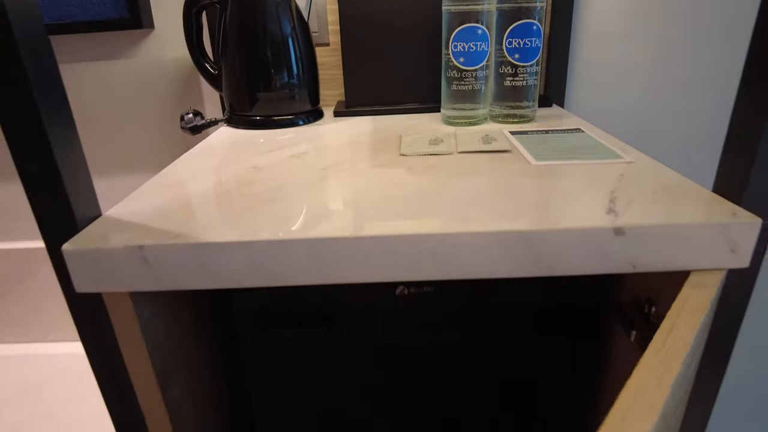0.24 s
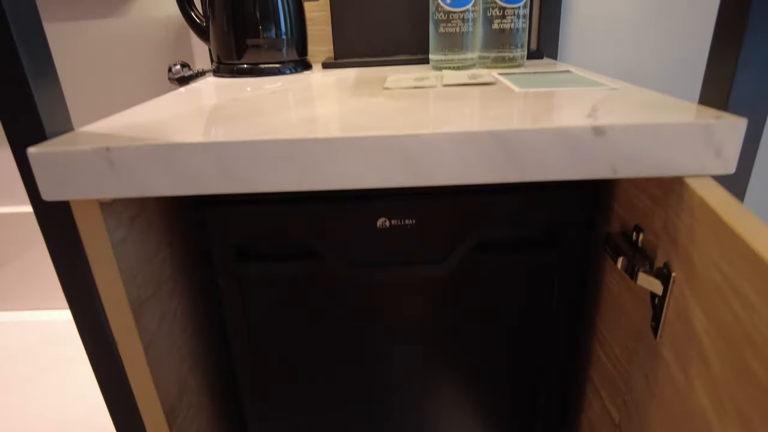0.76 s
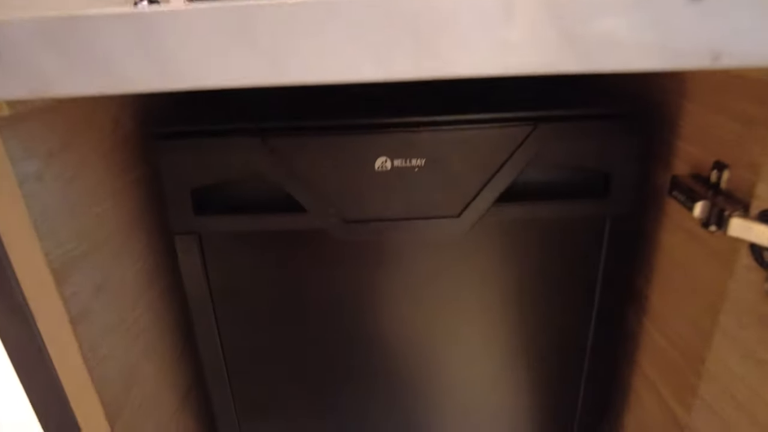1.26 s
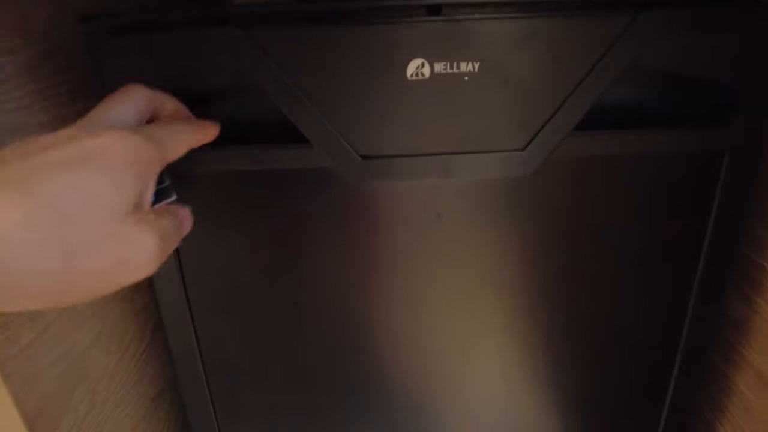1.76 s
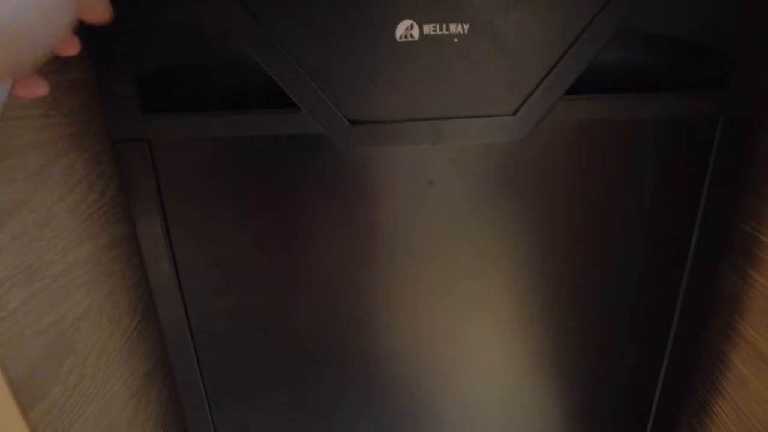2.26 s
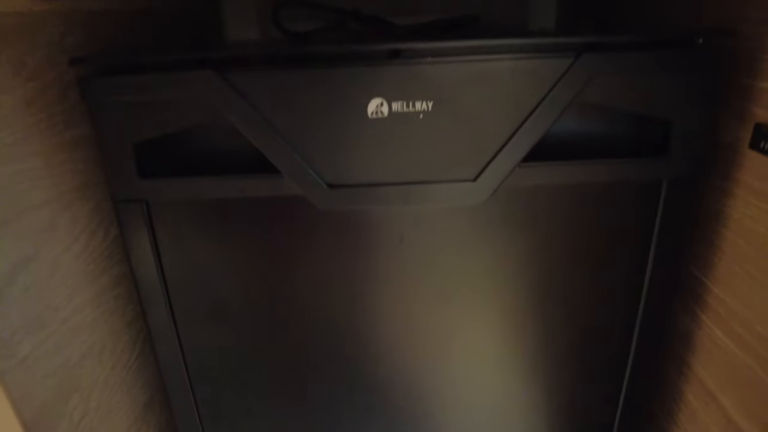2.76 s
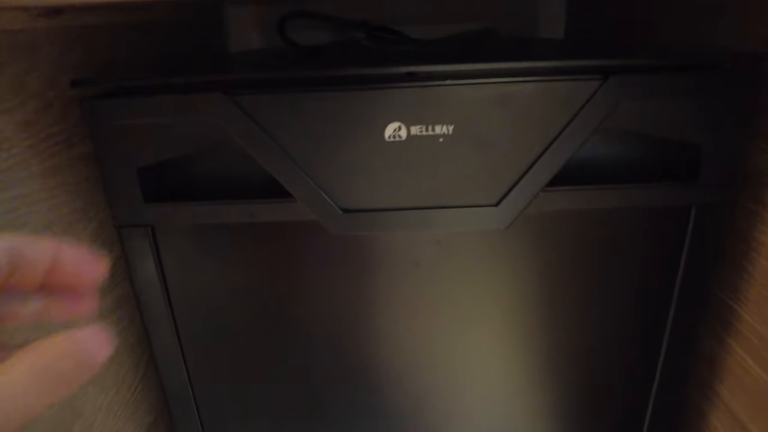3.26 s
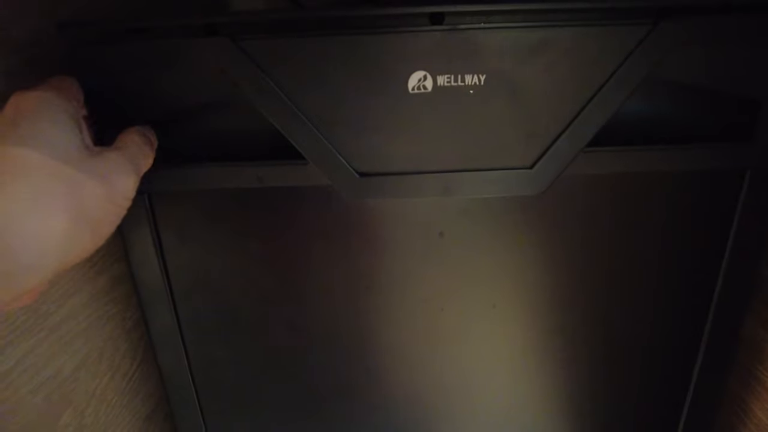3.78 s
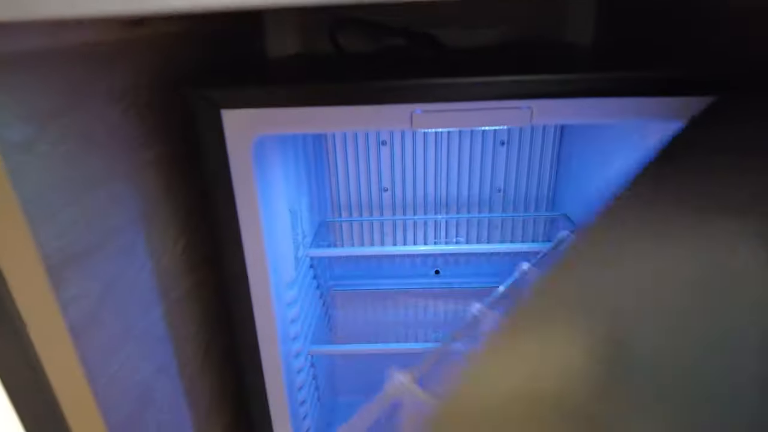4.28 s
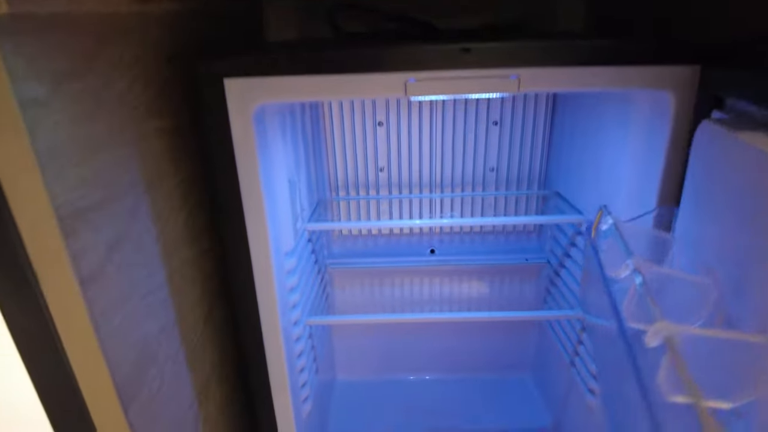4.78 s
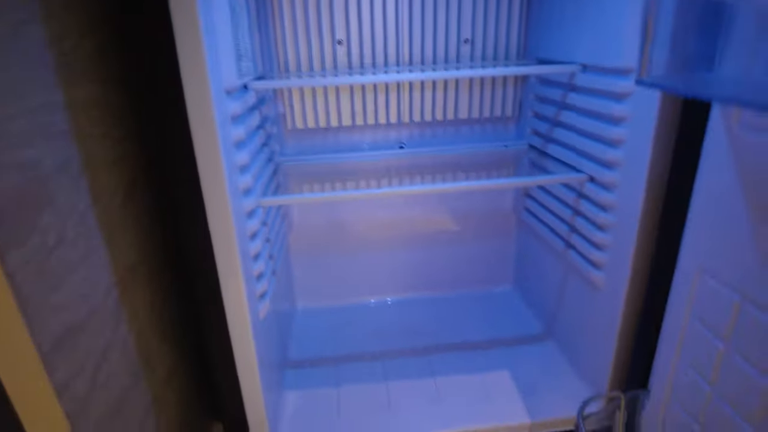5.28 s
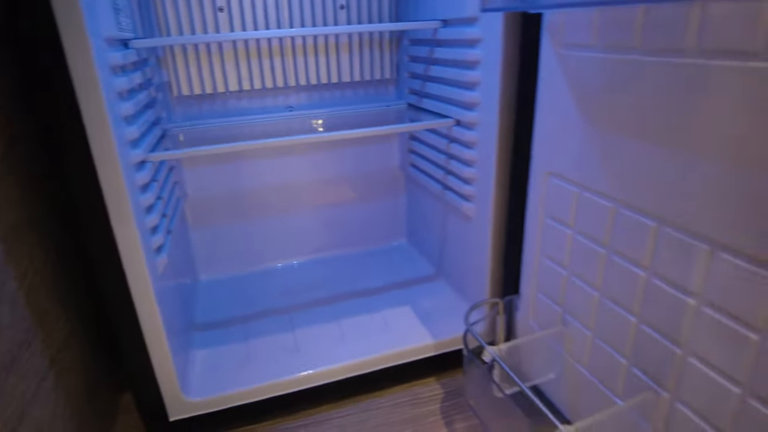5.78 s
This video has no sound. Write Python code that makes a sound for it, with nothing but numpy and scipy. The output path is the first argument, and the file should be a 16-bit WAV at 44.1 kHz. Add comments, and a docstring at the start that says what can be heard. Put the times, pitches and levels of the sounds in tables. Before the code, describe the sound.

Over a low ventilation rumble in a hotel room, a cupboard hinge rasps faintly and its wooden door bumps wide. Fingers knock hard on a hollow plastic fridge door, scrape and squeak briefly, and clack the trim. After a bright snap and a pause, the magnetic seal peels with crackles and pops. The door swings almost silently, ticks at the hinge and bumps the cupboard. A hand-held phone is close.

```python
"""A hand knocks and scrapes at a small fridge's plastic door, after a cupboard door swings open in a hotel room.
Noise bursts excite panel modes; after a sharp snap, random slips peel the magnetic seal.
The fridge door then swings until it bumps the cupboard.
A sleeve (slip noise) rustles close to the hand-held phone; ventilation (shaped noise) rumbles behind."""
import sys
import numpy as np
from scipy import signal
from scipy.fft import rfft, irfft
from scipy.io import wavfile

SR = 44100
rng = np.random.default_rng(int(sys.argv[2]) if len(sys.argv) > 2 else 0)


def digitize_waveform(pressure):
    """Quantize a signal to 16-bit integers and store it at the path in sys.argv[1].

    Rows of a 2-D input are taken as channels; values are limited to [-1, 1].
    """
    field = np.atleast_2d(pressure).T
    bounded = np.clip(field, -1, 1)
    quanta = np.round(bounded * 32767).astype(np.int16)
    wavfile.write(sys.argv[1], SR, quanta)


N = 266220
T = np.arange(N) / SR

# finger drags on the handle: t/s, length/s, level/dB, squeak f/Hz, squeak gain/dB
FINGER_SCRAPES = [(1.854, 0.03, -50, 2250, 15), (1.892, 0.038, -49, 2420, 11), (1.977, 0.038, -45, 2550, 4),
                  (2.001, 0.019, -48, 1830, -2), (2.024, 0.018, -48, 2720, 11), (2.07, 0.08, -79, 900, 11),
                  (2.139, 0.023, -53.5, 1490, -7), (2.248, 0.021, -59.5, 1640, -1),
                  (2.339, 0.036, -63, 1580, 16), (2.358, 0.012, -63.5, 1714, 1),
                  (2.473, 0.019, -66, 1520, 15)]

# lag of the right microphone behind the left
HAND_LEAD_SAMPLES, SEAL_LEAD_SAMPLES, CUPBOARD_LEAD_SAMPLES = 3, 2, 0
WALL_ECHO_S = 0.0016
# hand and phone keep moving: renewal step of rings and echoes, scatter of mode strength and tuning
MOVE_S, MODE_SCATTER_DB, MODE_DETUNE_SHARE = 0.25, 1.5, 0.008
# each doubling of contact length tilts a blow's spectrum down about the pivot
FIRM_CONTACT_S, DULLING_DB_PER_OCTAVE, PIVOT_HZ = 0.0027, 1.84, 970


def undb(db):
    """Decibels to gain."""
    return 10 ** (np.asarray(db) / 20)


def unit(x):
    """Scale to rms 1."""
    return x / np.sqrt(np.mean(x ** 2))


def over_bins(points, size):
    """Interpolate (f/Hz, value) points over log frequency at the bins of a transform."""
    hz, value = np.transpose(points)
    bins_hz = np.arange(size // 2 + 1) * SR / size
    return np.interp(np.log(bins_hz + 1), np.log(hz), value)


def colour(x, points):
    """Shape the spectrum of x, falling away below the first point; rms 1."""
    hz = np.arange(N // 2 + 1) * SR / N
    skirt = np.minimum(hz / points[0][0], 1) ** 4
    return unit(irfft(rfft(x) * undb(over_bins(points, N)) * skirt, N))


def diffuse(size):
    """Noise from all sides: bass alike in both microphones, treble mostly less so."""
    # likeness of the two microphones: f/Hz, correlation
    likeness = [(60, 0.97), (130, 0.96), (290, 0.89), (640, -0.17), (1400, 0.55), (3100, 0.0065),
                (7000, -0.11), (15000, -0.68)]
    alike = np.clip(over_bins(likeness, size), -1, 1)
    mid, side = rfft(rng.standard_normal((2, size)))
    mid = mid * np.sqrt((1 + alike) / 2)
    side = side * np.sqrt((1 - alike) / 2)
    return irfft(np.array([mid + side, mid - side]), size)


def fade(t, t60):
    """Exponential decay, 60 dB in t60."""
    return np.exp(-np.log(1000) * t / t60)


def add(track, s, x):
    """Mix x into the track at time s."""
    start = int(s * SR)
    track[start:start + len(x)] += x[:N - start]


def wander(rate_hz):
    """Random line of spread near 1, with a new value rate_hz times a second."""
    moments = np.arange(0, T[-1], 1 / rate_hz)
    return np.interp(T, moments, rng.standard_normal(len(moments)))


def slips(rate_hz, spread_db):
    """Stick and slip: random tiny releases of uneven size."""
    size = undb(spread_db * np.minimum(rng.exponential(size=N), 4))
    return (rng.random(N) < rate_hz / SR) * size * rng.choice([-1, 1], N)


def strokes(rows):
    """Gain of (t/s, length/s, level/dB) gestures that swell and ebb smoothly."""
    return sum(undb(db) * np.exp(-(2 * (T - s) / length) ** 2) for s, length, db, *_ in rows)


def changing(x, response, overlap):
    """Filter overlapping stretches of x by freshly drawn responses, as hand and phone move."""
    hop = int(MOVE_S * SR)
    padded = np.pad(x, (hop, 2 * hop))
    window = overlap(np.sin(np.pi * np.arange(2 * hop) / (2 * hop)))
    pieces = []
    for i in range(0, N + hop, hop):
        stretch = (window * padded[i:i + 2 * hop])[None]
        pieces.append(signal.fftconvolve(stretch, response(), axes=1))
    out = np.zeros((len(pieces[0]), N + 3 * SR))
    for k, piece in enumerate(pieces):
        out[:, k * hop:k * hop + piece.shape[1]] += piece
    return out[:, hop:hop + N]


def ring(x, modes):
    """Direct sound plus the decaying modes it excites; strength and tuning shift with the place of the hand."""
    t = T[:SR // 4]
    hz, db, t60 = np.transpose(modes)
    # unit gain at resonance for 0 dB
    peak_scale = 2 * np.log(1000) / (t60 * SR)
    decays = (undb(db) * peak_scale)[:, None] * fade(t, t60[:, None])

    def response():
        """One draw of the modes' impulse response."""
        strength, tuning = rng.standard_normal((len(hz), 2)).T
        mode_hz = hz * (1 + MODE_DETUNE_SHARE * tuning)
        waves = np.cos(np.outer(2 * np.pi * mode_hz, t).astype(np.float32))
        gain = undb(MODE_SCATTER_DB * strength)[:, None]
        return (gain * decays * waves).sum(axis=0)[None]
    return x + changing(x, response, np.square)[0]


def blows(rows, tone, tip, rise_share, spot_db=9, spot_width_hz=240, span_s=0.0035):
    """Contact noise builds up, meets hard at one instant (tip) and chatters away; levels are rms over span_s."""
    # band edges of boom, body, clack, tick, sheen: f/Hz
    blow_edges = [110, 400, 1100, 3300, 9500, 15500]
    track = np.zeros(N)
    t = np.arange(-SR // 40, SR // 10) / SR
    edges = np.transpose([blow_edges[:-1], blow_edges[1:]])
    bands = [signal.butter(3, pair, "band", fs=SR, output="sos") for pair in edges]
    octaves = np.log2(edges / PIVOT_HZ).mean(axis=1)
    for s, db, contact_s, spot_hz in rows:
        envelope = np.exp(np.minimum(t / rise_share, -t) / contact_s)
        force = rng.standard_normal(len(t)) * envelope - tip * (t == 0)
        # the struck spot has a short ring of its own
        spot = signal.iirpeak(spot_hz, spot_hz / spot_width_hz, fs=SR)
        force = force + undb(spot_db) * signal.lfilter(*spot, force)
        tilt = -DULLING_DB_PER_OCTAVE * np.log2(contact_s / FIRM_CONTACT_S)
        for sos, band_db in zip(bands, db + np.array(tone) + tilt * octaves):
            burst = unit(signal.sosfilt(sos, force)) * np.sqrt(span_s * SR / len(t))
            add(track, s + t[0], undb(band_db) * burst)
    return track


def ventilation():
    """Low rumble and a gently swaying rush of air, both changing as the phone moves."""
    # rumble level: t/s, level/dB
    rumble_level = [(0, -48.5), (1, -49), (2.3, -44.5), (2.85, -50), (4.4, -46.5), (5.3, -51.5),
                    (6.04, -49.5)]
    # rumble spectrum: f/Hz, level/dB
    rumble_colour = [(12, -25.5), (20, 1), (34, 4), (70, -5.5), (138, -9), (161, -14.5), (192, -12),
                     (274, -17), (309, -12), (348, -22), (392, -14.5), (428, -17.5), (700, -36), (910, -74),
                     (1540, -120)]
    # room air as the phone moves into the cupboard: t/s, level/dB
    air_level = [(0, -64), (1.1, -59), (2.5, -64), (3.45, -66), (4.25, -63), (5.1, -69), (5.5, -66.5),
                 (6.04, -64.5)]
    # air spectrum: f/Hz, level/dB
    air_colour = [(290, -1.5), (500, -0.5), (657, -2), (901, -5.5), (1170, -8.5), (1410, -6), (2330, -13.5),
                  (2800, -13), (5130, -29.5), (6090, -28), (15500, -35.5)]
    rumble = colour(diffuse(N), rumble_colour) * undb(np.interp(T, *np.transpose(rumble_level)))
    sway_db = 0.7 * wander(9)
    air_db = np.interp(T, *np.transpose(air_level)) + sway_db
    air = colour(diffuse(N), air_colour) * undb(air_db)
    return rumble + air


def sleeve():
    """Cloth fibres catch and let go in swelling strokes and with each scrape; a faint uneven rustle persists."""
    # sleeve brushes: t/s, length/s, level/dB
    brushes = [(.62, 0.2, -81), (.675, 0.02, -71), (.74, 0.021, -72.5), (1.138, 0.074, -65),
               (1.362, 0.055, -73), (2.19, 0.082, -72), (2.686, 0.04, -71), (2.876, 0.15, -73.5),
               (3.536, 0.026, -71.5), (3.87, 0.16, -73), (5.091, 0.012, -71), (5.13, 0.23, -78.5)]
    # cloth spectrum: f/Hz, level/dB
    cloth_colour = [(1500, 6), (3000, -1), (5500, 5), (8000, 0), (11000, -0.5), (14000, -2), (16000, 3.5)]
    scrape_share_db = -21.5
    motion = strokes(brushes) + undb(scrape_share_db) * strokes(FINGER_SCRAPES)
    stir = undb(-88 + 4 * wander(25))
    fibres = slips(rate_hz=9000, spread_db=3)
    return colour(fibres, cloth_colour) * (motion + stir)


def cupboard():
    """Bumps and a grating hinge excite damped panel modes; the fridge door's racks ring when it bumps the cupboard."""
    # sprung hinge grating: t/s, level/dB, contact/s, spot f/Hz
    spring_rasps = [(.1765, -54, 0.02, 2730), (1.164, -65, 0.012, 2130)]
    # wooden door bumping as it swings wide: t/s, level/dB, contact/s, spot f/Hz
    door_bumps = [(.5645, -54, 0.004, 1520), (.594, -62, 0.0062, 1580), (1.353, -47, 0.0075, 1360),
                  (1.369, -59, 0.02, 610), (1.39, -78, 0.0088, 1350), (1.455, -60, 0.0033, 2960)]
    # fridge door bumping and rebounding: t/s, level/dB, contact/s, spot f/Hz
    stop_blows = [(5.7475, -49.5, 0.0045, 2000), (5.7645, -55, 0.0046, 2840), (5.828, -66.5, 0.011, 477),
                  (5.857, -61, 0.017, 770)]
    # firm-blow spectra: boom/dB, body/dB, clack/dB, tick/dB, sheen/dB
    spring_tone = (-14.5, -4, 11, 15, -11)
    bump_tone = (5, 4.5, 0.5, -5.5, -26)
    stop_tone = (5.5, 0.5, 0.5, -5.5, -28)
    # cupboard panel, then plastic door racks: f/Hz, level re direct blow/dB, t60/s
    panel_modes = [(152, 3, 0.05), (250, 14, 0.13), (590, 7, 0.08), (1290, -1, 0.1), (1620, 3, 0.05)]
    rack_modes = [(194.5, 7, 0.13), (584, 6, 0.15), (700, 15.5, 0.089), (838, 18, 0.13), (1710, 7, 0.028),
                  (2025, 3, 0.07)]
    bumps = blows(door_bumps, bump_tone, tip=1.7, rise_share=0.48, spot_db=8.5)
    rasps = blows(spring_rasps, spring_tone, tip=7.0, rise_share=0.052, spot_db=-16)
    stop = blows(stop_blows, stop_tone, tip=1.5, rise_share=0.95, spot_db=1.5)
    return ring(bumps + rasps, panel_modes) + ring(stop, rack_modes)


def thumps():
    """Each push rocks the whole cabinet in decaying low modes."""
    # pushes: t/s, level/dB
    pushes = [(1.345, -29), (1.573, -34.5), (1.613, -32.5), (1.815, -20.5), (1.994, -46), (2.303, -38.5),
              (2.5, -29.5), (3.527, -37.5), (3.627, -37), (3.85, -44), (3.918, -40), (5.765, -34.5),
              (5.823, -39.5)]
    # cabinet rocking: f/Hz, level/dB, t60/s
    cabinet_modes = [(61.55, -6.5, 0.46), (87.7, -1.5, 0.13), (134.6, -9.5, 0.21)]
    track, t = np.zeros(N), T[:SR // 2]
    rocking = sum(undb(db) * fade(t, t60) * np.sin(2 * np.pi * hz * t) for hz, db, t60 in cabinet_modes)
    for s, db in pushes:
        add(track, s, undb(db) * rocking)
    return track


def scrapes(squeak_width_hz=380):
    """Fingers stick and slip on plastic; each drag has a squeak of its own pitch and strength."""
    # scrape spectrum: f/Hz, level/dB
    scrape_colour = [(47, -22), (80, 10.5), (244, -14), (379, -14), (520, -7), (833, -23), (1100, -19),
                     (1570, -17.5), (2000, -20), (2780, -20), (3610, -35), (4300, -40), (6000, -31),
                     (15000, -50)]
    grain = colour(slips(rate_hz=800, spread_db=4), scrape_colour)
    track = np.zeros(N)
    for s, length, db, hz, squeak_db in FINGER_SCRAPES:
        resonance = signal.iirpeak(hz, hz / squeak_width_hz, fs=SR)
        squeak = undb(squeak_db) * signal.lfilter(*resonance, grain)
        track += (grain + squeak) * strokes([(s, length, db)])
    return track


def fridge_door():
    """Knocks and scrapes ring the door and its hollow, clacks ring the trim; hinge ticks stay dry."""
    # knuckles and fingertips on the door: t/s, level/dB, contact/s, spot f/Hz
    door_knocks = [(1.8128, -38, 0.0007, 2380), (1.823, -57.5, 0.0089, 210), (1.8305, -38.5, 0.0011, 1240),
                   (1.837, -55, 0.0026, 2180), (1.848, -54.5, 0.0017, 2370), (1.856, -54.5, 0.0032, 1340),
                   (1.894, -53.5, 0.0012, 3170), (2.003, -49, 0.0053, 560), (2.018, -60, 0.0042, 600),
                   (2.029, -55, 0.0021, 2700), (2.149, -64, 0.00058, 3300), (2.206, -58, 0.014, 950),
                   (2.478, -55.5, 0.0016, 1520), (2.502, -61.5, 0.019, 255), (3.63, -56, 0.00094, 2370)]
    # thin plastic trim: t/s, level/dB, contact/s, spot f/Hz
    trim_clacks = [(2.134, -60, 0.0078, 700), (2.188, -48, 0.0049, 1650), (2.199, -57.5, 0.0059, 980),
                   (2.358, -57.5, 0.004, 1670)]
    # turning hinge: t/s, level/dB, contact/s, spot f/Hz
    hinge_ticks = [(4.7705, -66.5, 0.0036, 2800), (4.919, -81.5, 0.00013, 4560),
                   (5.406, -75.5, 0.0018, 2770)]
    # firm-blow spectra: boom/dB, body/dB, clack/dB, tick/dB, sheen/dB
    door_tone = (9.5, -7.5, -3, -10.5, -24)
    trim_tone = (-13, 1.5, 4.5, -12, -28)
    hinge_tone = (6, 5.5, 9, -0.5, -14)
    # door and its hollow, then trim: f/Hz, level re direct blow/dB, t60/s
    door_modes = [(142, 9, 0.12), (193.5, 12.5, 0.28), (235.3, 13.5, 0.14), (280.4, 5, 0.17),
                  (406, -5, 0.17), (480, 0, 0.15), (613, 3, 0.045), (703, 1.5, 0.032), (880, 9, 0.047),
                  (1595, 7, 0.051), (1670, -11, 0.024), (2140, 0, 0.048), (2450, -7, 0.082),
                  (2530, 2.5, 0.052), (2760, 3, 0.021), (3120, -2, 0.036), (3420, 9, 0.046),
                  (4180, 5, 0.0058)]
    trim_modes = [(296, 9, 0.2), (900, 3, 0.07), (980, 6, 0.085), (1350, 2, 0.06), (1600, 2, 0.06),
                  (1700, 5, 0.1), (2530, 4, 0.07)]
    knocks = blows(door_knocks, door_tone, tip=0.94, rise_share=1.0)
    clacks = blows(trim_clacks, trim_tone, tip=2.7, rise_share=0.45, spot_db=20)
    ticks = blows(hinge_ticks, hinge_tone, tip=3.4, rise_share=0.74, spot_db=3)
    return ring(knocks + scrapes(), door_modes) + ring(clacks, trim_modes) + ticks


def snap():
    """A catch lets go: a very short bright crack, then the plastic part rings and rattles."""
    # rattles after the crack: t/s, level/dB, contact/s, spot f/Hz
    rattles = [(2.9123, -47.5, 0.0013, 1640), (2.943, -55, 0.011, 860), (2.962, -61.5, 0.001, 2920)]
    # firm-blow spectrum: boom/dB, body/dB, clack/dB, tick/dB, sheen/dB
    snap_tone = (0.5, -3, -3, -4.5, -8)
    # snapping part: f/Hz, level re direct blow/dB, t60/s
    snap_modes = [(395, -1, 0.14), (1580, 7, 0.019), (1820, 2, 0.035), (2300, 13.5, 0.009),
                  (2700, 12, 0.021), (5900, 6.5, 0.008), (7640, 16.5, 0.0077)]
    # starting crack: t/s, f/Hz, level/dB, t60/s
    crack = (2.91135, 12500, -18.5, .0007)
    track = ring(blows(rattles, snap_tone, tip=1.9, rise_share=0.38), snap_modes)
    t = T[:SR // 100]
    s, hz, db, t60 = crack
    add(track, s, undb(db) * fade(t, t60) * np.sin(2 * np.pi * hz * t))
    return track


def pull():
    """Gain of the peeling seal: grows up to each release, then dies away."""
    # seal lets go at the handle, then towards the hinge: t/s, level/dB
    releases = [(3.942, -36), (4.121, -48)]
    pull_db_per_s, free_db_per_s = 85, 155
    gain = np.zeros(N)
    for s, db in releases:
        gain += undb(db + np.minimum(pull_db_per_s * (T - s), free_db_per_s * (s - T)))
    return gain


def seal():
    """The magnetic seal peels in random slips, crackles and pops off its rubber-damped frame."""
    # stretches popping free: t/s, level/dB, contact/s, spot f/Hz
    seal_pops = [(3.809, -54.5, 0.0013, 1810), (3.849, -50, 0.0021, 1380), (3.893, -40.5, 0.0058, 880),
                 (3.91, -58, 0.014, 610), (3.936, -54, 0.0033, 2770), (3.982, -55.5, 0.0026, 1750),
                 (4.028, -51.5, 0.0031, 1610), (4.082, -45, 0.0066, 2620), (4.11, -66, 0.0066, 1450),
                 (4.218, -57.5, 0.0041, 1410)]
    # firm-blow spectrum: boom/dB, body/dB, clack/dB, tick/dB, sheen/dB
    seal_tone = (-2, 0, -2, -9.5, -12.5)
    # tacky rubber coming away: t/s, length/s, level/dB
    crackles = [(3.828, 0.028, -63), (3.863, 0.038, -55), (3.945, 0.07, -52), (4.045, 0.04, -61),
                (4.103, 0.046, -54), (4.165, 0.073, -61), (4.245, 0.061, -64.5)]
    # peel and crackle spectra: f/Hz, level/dB
    peel_colour = [(35, -1), (60, 5.5), (130, 3.5), (195, 3.5), (290, 0.5), (400, -4), (480, -6.5),
                   (660, -19), (1100, -29), (2590, -28), (4840, -42), (15000, -65)]
    crackle_colour = [(300, 7), (450, 5), (680, 8), (880, 3), (1080, -13), (1300, 4), (1650, 3.5),
                      (1950, -11), (2600, -6), (3100, -8), (3800, -24), (7000, -25), (15000, -51)]
    # door frame damped by the rubber: f/Hz, level re direct blow/dB, t60/s
    frame_modes = [(195, -1, 0.12), (408, -3, 0.12), (472, -6, 0.1), (890, -7, 0.05), (1240, -4, 0.07)]
    peel = colour(slips(rate_hz=520, spread_db=2.5), peel_colour) * pull()
    crackle = colour(slips(rate_hz=650, spread_db=4), crackle_colour) * strokes(crackles)
    pops = blows(seal_pops, seal_tone, tip=1.0, rise_share=0.67, spot_db=4)
    return ring(peel + crackle + pops, frame_modes)


def room(x, lead_samples, cupboard_db, room_db, pan_db, wall_db,
         cupboard_t60_s=0.049, room_t60_s=0.42, damping_hz=6500, hollow_hz=420):
    """Direct sound, a panel echo, quick cupboard reflections and the duller tail of the room."""
    t = T[:16384]
    # the cupboard is too small to send back separate echoes of long waves
    hollow = signal.butter(2, hollow_hz, "high", fs=SR, output="sos")
    furnishings = signal.butter(2, [hollow_hz / 2, damping_hz], "band", fs=SR, output="sos")
    quick = fade(t, cupboard_t60_s) * np.minimum(t / 0.0002, 1)
    slow = fade(t, room_t60_s) * np.minimum(t / 0.0085, 1)

    def reflections():
        """One draw of the stereo reflections."""
        early = signal.sosfilt(hollow, diffuse(len(t)) * quick)
        late = signal.sosfilt(furnishings, diffuse(len(t)) * slow)
        return (undb(cupboard_db) * unit(early) + undb(room_db) * unit(late)) / np.sqrt(len(t))
    direct = np.array([undb(pan_db / 2) * x, undb(-pan_db / 2) * np.roll(x, lead_samples)])
    # panel straight ahead: its echo reaches both microphones together
    wall = undb(wall_db) * np.roll(x, int(WALL_ECHO_S * SR))
    return direct + wall + changing(x, reflections, np.abs)


def scene():
    """The hand works close by on the left; the seal behind the door's edge and the cupboard sound roomier."""
    cloth = room(sleeve(), HAND_LEAD_SAMPLES, cupboard_db=6.0, room_db=-39, pan_db=6.0, wall_db=1.0)
    wood = room(cupboard(), CUPBOARD_LEAD_SAMPLES, cupboard_db=1, room_db=-7.0, pan_db=3, wall_db=-44)
    door = room(fridge_door(), HAND_LEAD_SAMPLES, cupboard_db=1.0, room_db=-11.5, pan_db=2.0, wall_db=-15.5)
    catch = room(snap(), HAND_LEAD_SAMPLES, cupboard_db=-1.0, room_db=-7.0, pan_db=3.5, wall_db=-29)
    peeling = room(seal(), SEAL_LEAD_SAMPLES, cupboard_db=1.0, room_db=-10.5, pan_db=1.5, wall_db=-13.5)
    # slightly stronger on the right
    deep = (thumps() + ventilation()) * undb(np.array([[-0.5], [0.4]]))
    return door + peeling + wood + catch + cloth + deep


def record(dry):
    """The phone cuts the top of the treble with a steep low-pass."""
    top_hz = 15850
    return signal.sosfilt(signal.ellip(10, 0.2, 70, top_hz, fs=SR, output="sos"), dry)


dry = scene()
out = record(dry)
digitize_waveform(out)
```